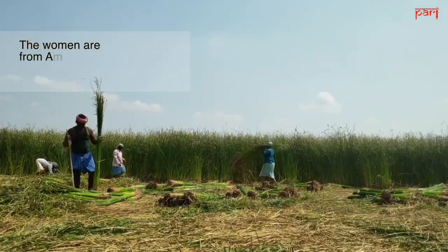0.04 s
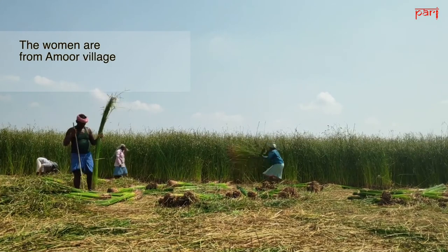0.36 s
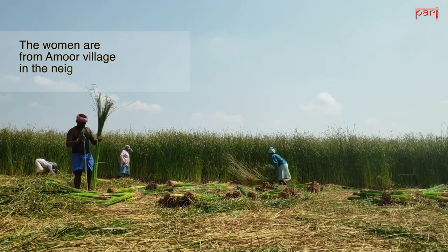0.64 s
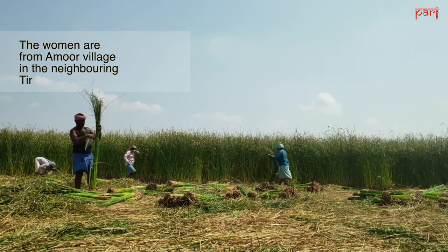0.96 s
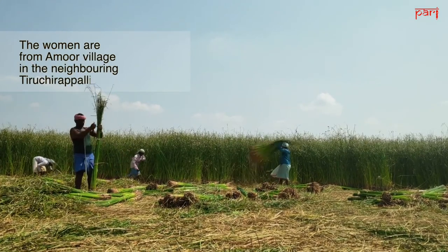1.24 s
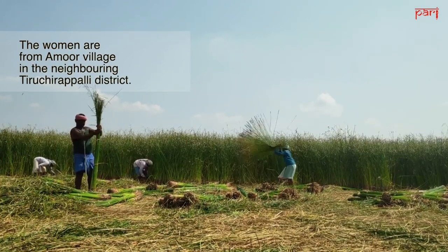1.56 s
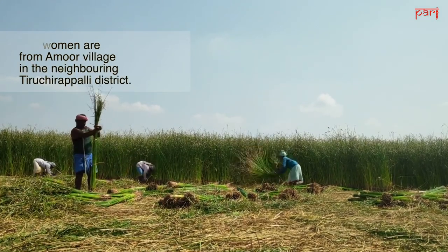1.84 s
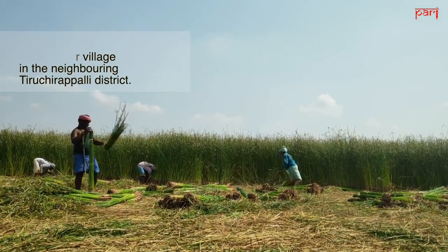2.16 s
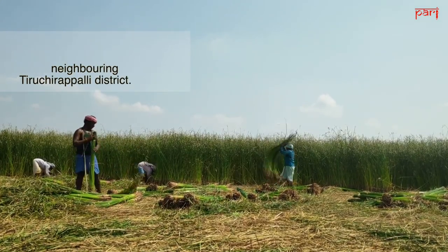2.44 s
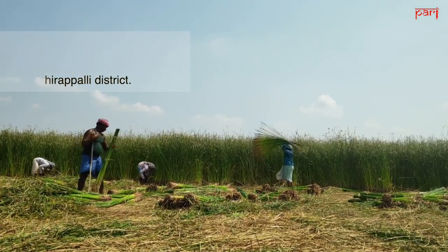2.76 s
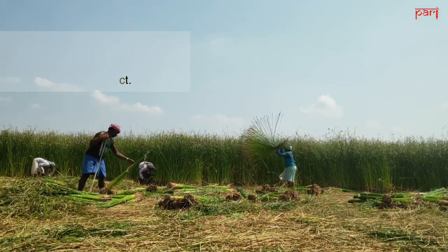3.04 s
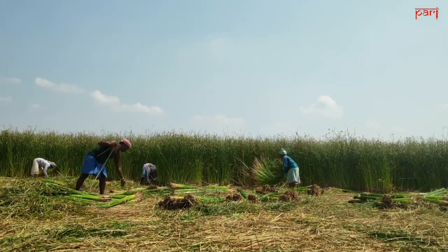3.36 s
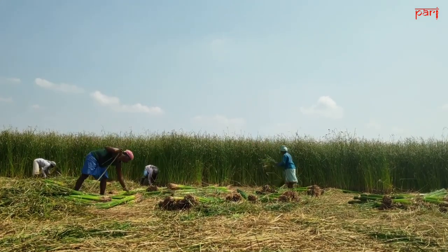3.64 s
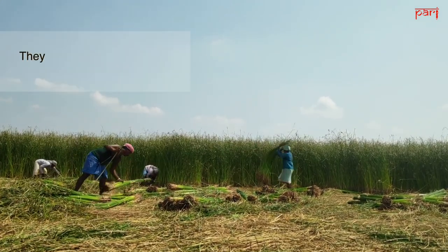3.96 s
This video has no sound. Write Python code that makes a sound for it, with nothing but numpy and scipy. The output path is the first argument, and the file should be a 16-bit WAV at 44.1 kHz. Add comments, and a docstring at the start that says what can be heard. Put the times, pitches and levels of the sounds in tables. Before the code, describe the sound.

Cut grass bundles being swung, stripped and slapped down outdoors, as gusts buffet the microphone.

```python
"""Bundles of cut reed grass are worked in an open field, each sound a swarm of tiny blade contacts.
Some way off, one bundle is swung down three times to shake out the short blades; nearer, a second is
stripped through a hand, swung and slapped down. Standing reeds rustle all round, a faint whistle comes
from far off, and light gusts buffet each of the two microphone ports in turn."""
import sys
import numpy as np
from scipy import signal
from scipy.fft import rfft, irfft
from scipy.io import wavfile
from scipy.ndimage import uniform_filter1d

SR = 44100
rng = np.random.default_rng(int(sys.argv[2]) if len(sys.argv) > 2 else 0)


def bounce(signal):
    """Save signal as a 16-bit WAV file at the path given by the first command-line argument."""
    frames = np.transpose(np.atleast_2d(signal))
    limited = np.clip(frames, -1, 1)
    pcm = np.round(limited * 32767).astype(np.int16)
    wavfile.write(sys.argv[1], SR, pcm)


N = 176400


def undb(db):
    """Decibels to gain."""
    return 10 ** (np.asarray(db) / 20)


def unit(x):
    """Scale to an rms of 1."""
    return x / np.sqrt(np.mean(x ** 2))


def times():
    """Time of every sample in seconds."""
    return np.arange(N) / SR


def freqs():
    """Frequency of every bin, at least 1 Hz."""
    return np.maximum(np.arange(N // 2 + 1) * SR / N, 1)


def over_hz(points):
    """Join (Hz, value) points on a log-frequency axis."""
    hz, value = np.array(points, float).T
    return np.interp(np.log(freqs()), np.log(hz), value)


def over_time(points):
    """Join (seconds, value) points."""
    return np.interp(times(), *np.array(points, float).T)


def colour(x, eq, tilt_db=0):
    """Causal EQ of unit power, tilted in dB per octave and rolled off under its lowest point."""
    db = over_hz(eq) + tilt_db * np.log2(freqs())
    gain = unit(undb(db) / np.sqrt(1 + (eq[0][0] / 2 / freqs()) ** 4))
    cepstrum = irfft(np.log(gain + 1e-6), N)
    cepstrum[1:N // 2] *= 2  # minimum phase: no ringing ahead of a hit
    cepstrum[N // 2 + 1:] = 0
    return irfft(rfft(x) * np.exp(rfft(cepstrum)), N)


def wander(rate_hz):
    """Smooth random modulation with an rms of 1."""
    hold = max(int(SR / rate_hz), 2)
    steps = np.repeat(rng.standard_normal(N // hold + 1), hold)
    return unit(uniform_filter1d(uniform_filter1d(steps, hold), hold)[:N])


def contacts(per_s, spread_db, hiss):
    """Three unrelated streams of tiny blade contacts, most weak and a few strong, over sliding hiss."""
    size = undb(spread_db * np.minimum(rng.exponential(size=(3, N)), 5))
    clicks = (rng.random((3, N)) < per_s / SR) * size * rng.choice([-1, 1], (3, N))
    return unit(unit(clicks) + hiss * rng.standard_normal((3, N)))


def hollow(x, ripple_db=2.5, ridge_hz=110.46):
    """Every stalk rings at its own pitches, so the spectrum is finely ridged."""
    ridges = np.interp(freqs() / ridge_hz, np.arange(1024), rng.standard_normal(1024))
    return irfft(rfft(x) * unit(undb(ripple_db * np.clip(ridges, -2, 2))), N)


def swell(at, rise, fall, shape):
    """A rounded rise and fall; a higher shape gives a blunter peak and shorter tails."""
    t = times() - at
    width = np.maximum(np.where(t < 0, rise, fall), 1e-4)
    return np.exp(-(np.abs(t) / width) ** shape / 2)


def bursts(rows, stream, eq, late_s=0, shape=1.32):
    """One swell of contacts per row, each with its own brightness."""
    return sum(colour(stream * swell(at + late_s, rise, fall, shape), eq, tilt) * undb(db)
               for at, db, rise, fall, tilt in rows)


# Tone difference between the ports. Each row: frequency in Hz, left minus right in dB.
PORT_BALANCE = [(500, 0.5), (2200, 0), (3000, 4), (3700, 5), (4800, -1), (6500, -.5), (7700, -4.5),
                (8500, 1), (9400, 8), (11300, 10.5), (12600, 6.5), (14300, 10), (16000, 5)]


def ports(streams, likeness, left_lag_s=0):
    """Three streams to stereo: one reaches both microphone ports, the others one port each."""
    spectra, shared = rfft(streams), np.clip(over_hz(likeness), 0, 1)
    pair = np.sqrt(shared) * spectra[0] + np.sqrt(1 - shared) * spectra[1:]
    pair[0] *= np.exp(-2j * np.pi * freqs() * left_lag_s)
    sides = undb(np.array([[1], [-1]]) * over_hz(PORT_BALANCE) / 2)
    return irfft(pair * sides / np.sqrt(np.mean(sides ** 2, axis=0)), N)


# Fader ride of the reed bed. Each row: time in seconds, level in dB.
REED_LEVEL = [(0, -48), (.4, -49.5), (.65, -47.5), (.95, -48.5), (1.25, -51), (1.48, -52), (1.7, -48.5),
              (2.18, -47.5), (2.28, -49.5), (2.35, -51.5), (2.62, -46.5), (2.78, -48.5), (2.88, -52),
              (3.12, -51.5), (3.35, -47), (3.7, -50), (3.85, -47), (4, -47)]
# Airy reeds and dark field tone. Each row: frequency in Hz, relative level in dB.
REED_EQ = [(240, -52), (400, -8), (432, -26), (560, -16), (673, -18.5), (772, -16.5), (1220, -17),
           (1300, -10), (1660, -25.5), (1820, -9), (2120, -13), (3360, -6.5), (5070, -7), (9070, 0.5),
           (15500, -2.5)]
FIELD_EQ = [(30, 7.5), (100, -11), (250, -9), (500, -29), (1000, -29.5), (2000, -22.5), (4000, -70)]
# A wide image. Each row: frequency in Hz, share of power common to both ports.
REED_LIKENESS = [(400, 0.52), (1300, 0.05), (2000, 0.27), (6000, 0.05), (9000, .02), (15000, 0.031)]


def reeds(flicker_db=1.03, tick_db=-12, field_db=-62):
    """Countless blades brush in the breeze, with odd dry ticks, over the low murmur of the field."""
    brush = contacts(per_s=2500, spread_db=3.5, hiss=1.87) * undb(flicker_db * wander(20))
    clicks = contacts(per_s=120, spread_db=2.5, hiss=0)
    tick_tail = rng.standard_normal(200) * np.exp(-np.arange(200) / 50)
    ticks = unit(signal.lfilter(tick_tail, 1, clicks)) * undb(tick_db)  # relative to the brush
    leaves = colour(brush + ticks, REED_EQ) * undb(over_time(REED_LEVEL))
    murmur = undb(field_db) * colour(rng.standard_normal(N), FIELD_EQ)
    return ports(leaves, REED_LIKENESS) + murmur


# Wind pressure at each port. Each row: time in seconds, rumble level in dB.
GUSTS_LEFT = [(0, -50.5), (.6, -56.5), (1.2, -57), (1.9, -53), (2.64, -54), (2.72, -43.5), (2.9, -31.5),
              (3.06, -42), (3.18, -35.5), (3.28, -41), (3.4, -43.5), (3.5, -52), (3.7, -48.5), (3.8, -35),
              (3.88, -47), (4, -34.5)]
GUSTS_RIGHT = [(0, -56), (.5, -47.5), (.74, -53), (1.04, -45), (1.2, -34), (1.36, -41.5), (1.56, -35),
               (1.8, -36.5), (2.0, -39), (2.1, -39), (2.3, -47.5), (2.56, -34.5), (2.74, -35),
               (3.04, -40.5), (3.17, -33), (3.27, -49.5), (3.55, -47.5), (4, -51.5)]
# Deep rumble and the eddies above it. Each row: frequency in Hz, relative level in dB.
RUMBLE_EQ = [(20, -9), (37, 3), (70, 0.5), (120, -8.5), (200, -21.5), (400, -48), (900, -54)]
EDDY_EQ = [(30, -22), (80, 1.5), (130, -2.5), (220, -10.5), (320, -17), (500, -34), (1200, -52)]


def wind(gusts, rumble_flutter_db=2, eddy_flutter_db=4.0, eddy_growth=1.71):
    """Wind rumbles on one port; stronger gusts shed quick, brighter eddies."""
    gust_db = over_time(gusts)
    rumble = unit(colour(rng.standard_normal(N), RUMBLE_EQ) * undb(rumble_flutter_db * wander(20)))
    eddies = unit(colour(rng.standard_normal(N) * undb(eddy_flutter_db * wander(45)), EDDY_EQ))
    eddy_db = -45.5 + eddy_growth * (gust_db + 34.5)  # eddies grow faster than the rumble
    return rumble * undb(gust_db) + eddies * undb(eddy_db)


# Small handling noises. Each row: peak time in seconds, level in dB, rise and fall in seconds,
# treble tilt in dB per octave.
RUSTLES = [(.112, -45, 0.0057, 0.011, 0.5), (1.09, -52, 0.05, 0.11, 0.1), (1.38, -62, 0.014, 0.061, -3.5),
           (2.295, -55, 0.0068, 0.01, -1), (2.412, -47, 0.00087, 0.0023, 2.5),
           (2.465, -52.5, 0.049, 0.038, -1), (3.168, -50.5, .01, .009, 1),
           (3.476, -46.5, 0.0061, 0.0089, -3.5), (3.917, -43.5, 0.0042, .02, 1)]
# Their crisp tone. Each row: frequency in Hz, relative level in dB.
RUSTLE_EQ = [(300, -11), (800, -9), (1500, -6), (2200, -2.5), (3200, 3.5), (6000, 1.5), (10000, 4.5),
             (15500, -11)]
# Image of the handling and the far bundle. Each row: frequency in Hz, share of power common to both ports.
FAR_LIKENESS = [(500, 1), (2000, 0.86), (3000, 0.32), (5000, 0.41), (8000, 0.03), (15000, 0.6)]


def handling():
    """Short crackly rustles as stalks are gathered and trodden."""
    crackle = hollow(contacts(per_s=2500, spread_db=2.5, hiss=0.55))
    return ports(bursts(RUSTLES, crackle, RUSTLE_EQ), FAR_LIKENESS)


# Downstrokes of the far bundle. Each row: peak time in seconds, level in dB, rise and fall in seconds,
# treble tilt in dB per octave.
LASHES = [(.748, -39, 0.025, 0.031, 1.2), (2.042, -32, 0.021, 0.025, 1.5), (3.502, -36, 0.033, 0.04, 2)]
# A low knock under a bright thrash. Each row: frequency in Hz, relative level in dB.
LASH_EQ = [(160, -33), (280, 0), (405, -14), (648, -10.5), (938, -20), (1110, -13.5), (1530, -17.5),
           (1870, -10.5), (2100, -10), (2210, -20.5), (2400, -8.5), (2570, -10), (3360, -5), (4780, -7.5),
           (5850, -2), (6810, -5), (9060, -1.5), (11700, -8), (15500, -14)]


def far_bundle(crossover_hz=6940, tips_late_s=0.0056):
    """The stalks lash the stubble, and the fine tips follow with a brighter hiss."""
    stalks = hollow(contacts(per_s=3000, spread_db=3.2, hiss=.7))
    stalks = irfft(rfft(stalks) / (1 + (freqs() / crossover_hz) ** 8), N)
    tips = hollow(contacts(per_s=5000, spread_db=3.2, hiss=.7))
    tips = irfft(rfft(tips) / (1 + (crossover_hz / freqs()) ** 8), N)
    stalk_hits = bursts(LASHES, stalks, LASH_EQ, shape=1.68)
    tip_hits = bursts(LASHES, tips, LASH_EQ, tips_late_s, shape=1.48)
    return ports(stalk_hits + tip_hits, FAR_LIKENESS)


# Wind pops. Each row: peak time in seconds, level in dB, half length in seconds, left minus right in dB.
PUFFS = [(1.128, -38, 0.015, -30), (1.212, -35, 0.015, -28), (1.497, -32, 0.016, -33),
         (1.553, -30, 0.02, -32), (1.663, -31.5, 0.016, -32), (1.986, -27.5, 0.007, -30),
         (2.037, -36.5, 0.017, -19), (2.734, -30.5, 0.01, -22), (2.797, -37.5, 0.0076, 6),
         (2.917, -30.5, 0.011, 14), (3.142, -32, 0.0082, -22), (3.181, -33.5, 0.009, 2),
         (3.801, -37.5, 0.0061, 20)]
# Their bassy thud. Each row: frequency in Hz, relative level in dB.
PUFF_EQ = [(30, -4), (65, 2.5), (130, -4), (200, -12), (280, -27), (450, -43), (1000, -65.5)]


def puffs():
    """Single eddies hit the ports as brief, dull flaps of air."""
    air = unit(colour(rng.standard_normal(N), PUFF_EQ))
    out = 0
    for at, db, half, pan_db in PUFFS:
        envelope = swell(at, half, half, shape=1.75)
        makeup = np.sqrt(np.sum(envelope ** 2) / np.sum((air * envelope) ** 2))
        sides = undb(np.array([[pan_db], [-pan_db]]) / 2)
        out = out + air * envelope * makeup * undb(db) * sides / np.linalg.norm(sides)
    return out


# Faint far-off notes. Each row: peak time in seconds, pitch in Hz, level in dB, half length in seconds.
WHISTLES = [(1.38, 2750, -65, .025), (2.263, 2730, -68, 0.058), (2.43, 2710, -67, 0.035),
            (2.945, 2700, -67, 0.021)]


def whistle(waver=.02, flutter_db=3):
    """A wavering, broken thin tone, perhaps a distant bird."""
    warped_time = np.cumsum(1 + waver * wander(90)) / SR
    flutter = unit(undb(flutter_db * wander(70)))
    return flutter * sum(np.sin(2 * np.pi * hz * warped_time) * undb(db) * swell(at, half, half, 1.8)
                         for at, hz, db, half in WHISTLES)


# The hand's stroke along the near bundle. Each row: time in seconds, level in dB.
STRIP_LEVEL = [(1.64, -55), (1.705, -51), (1.728, -39.5), (1.765, -42.5), (1.79, -36.5), (1.86, -37),
               (1.905, -36.5), (1.935, -42.5), (1.975, -47), (2.01, -69)]
# Its raspy tone. Each row: frequency in Hz, relative level in dB.
STRIP_EQ = [(500, -27), (650, -22), (850, -8), (1050, -10.5), (1250, -2), (1450, -3), (1630, -20),
            (1820, -5.5), (2030, -3.5), (2230, -16), (2500, -2), (3000, -1), (3500, 1.5), (4100, 1),
            (4900, 2.5), (6000, 0), (7000, -4), (10400, 3), (15500, -8.5)]


def stripping(judder_db=0.96, catch_db=3, ring_hz=1180, ring_width_hz=400, ring_db=-20.5):
    """A hand drags unevenly along the stalks, which catch and ring."""
    friction = hollow(contacts(per_s=3000, spread_db=2.5, hiss=.55))
    scrape = colour(friction, STRIP_EQ) * undb(judder_db * wander(160))
    catches = contacts(per_s=900, spread_db=5, hiss=0.32)
    ring = signal.lfilter(*signal.iirpeak(ring_hz, ring_hz / ring_width_hz, fs=SR), catches)
    ring = unit(ring * undb(catch_db * wander(59.87))) * undb(ring_db)  # relative to the scrape
    gate = (times() > STRIP_LEVEL[0][0]) * (times() < STRIP_LEVEL[-1][0])
    return (scrape + ring) * undb(over_time(STRIP_LEVEL)) * gate


# The near swish. Each row: peak time in seconds, level in dB, rise and fall in seconds,
# treble tilt in dB per octave.
SWINGS = [(2.5, -35.5, 0.014, 0.036, 2.5)]
# Its sizzling tone. Each row: frequency in Hz, relative level in dB.
SWING_EQ = [(290, -48), (500, -14), (827, -13), (1430, -27), (2040, -10), (2200, -28), (2540, -6.5),
            (3900, -10.5), (5670, -4.5), (7130, -13), (7670, -8.5), (10400, 0), (15500, -19)]


def swinging():
    """Blades brush together as the near bundle swishes through."""
    return bursts(SWINGS, hollow(contacts(per_s=4000, spread_db=2.5, hiss=0.66)), SWING_EQ)


# Stalks landing in quick succession. Each row: peak time in seconds, level in dB, decay in seconds.
SLAPS = [(3.2548, -23, 0.0036), (3.258, -25, 0.0025), (3.2633, -31.5, 0.014), (3.286, -40.5, 0.025)]
# Low thump and bright crack. Each row: frequency in Hz, relative level in dB.
SLAP_EQ = [(200, -2), (260, 2), (350, -6), (500, -19.5), (680, -8), (900, -12), (1500, -18.5), (1880, -7),
           (2180, -13), (2600, -1), (3300, -0.5), (4100, -6), (5400, 3.5), (7200, -3.5), (10000, 1.5),
           (12500, -8), (15500, -12)]


def slapping(attack_s=0.0023):
    """Stalks land with sharp cracks, then the leaves settle."""
    force = 0
    for at, db, decay in SLAPS:
        t = times() - at
        attack = np.clip(1 + t / attack_s, 0, 1)
        force = force + undb(db) * attack * np.exp(-np.maximum(t, 0) / decay)
    return colour(hollow(contacts(per_s=9000, spread_db=3.1, hiss=0.92)) * force, SLAP_EQ)


# Image of the near bundle. Each row: frequency in Hz, share of power common to both ports.
NEAR_LIKENESS = [(500, 0.79), (2000, 1), (6000, 0.33), (9000, 0.17), (15000, 0.23)]


def near_bundle():
    """Stripping, swinging and slapping come from one side and reach the left port later."""
    return ports(stripping() + swinging() + slapping(), NEAR_LIKENESS, left_lag_s=0.00014)


def scene():
    """Both bundles, the field and the wind."""
    gusts = np.array([wind(GUSTS_LEFT), wind(GUSTS_RIGHT)])
    return reeds() + gusts + handling() + far_bundle() + puffs() + whistle() + near_bundle()


def record(dry, top_hz=15850):
    """A steep low-pass cuts the very top."""
    return signal.sosfilt(signal.ellip(10, .2, 70, top_hz, fs=SR, output="sos"), dry)


dry = scene()
out = record(dry)
bounce(out)
```